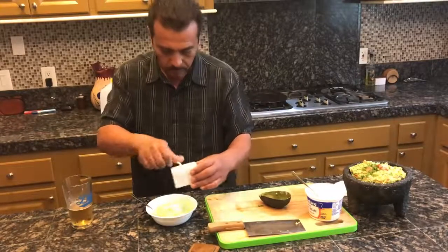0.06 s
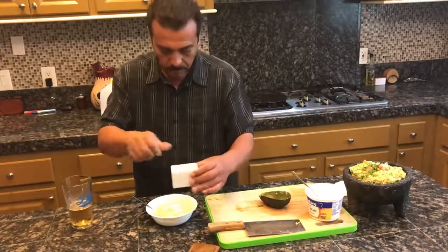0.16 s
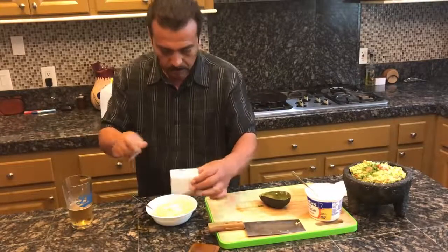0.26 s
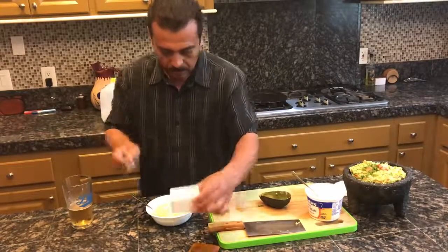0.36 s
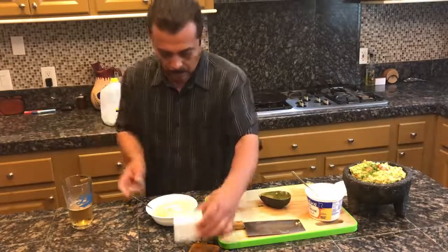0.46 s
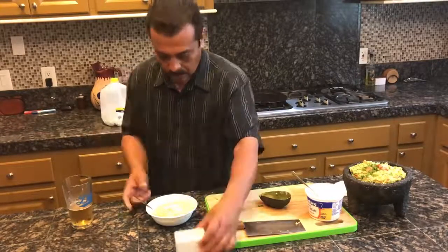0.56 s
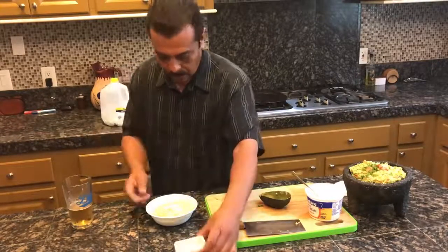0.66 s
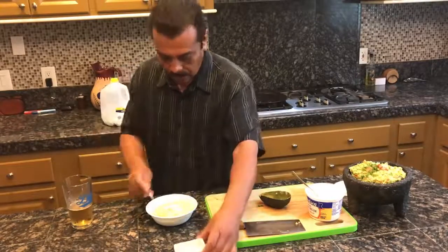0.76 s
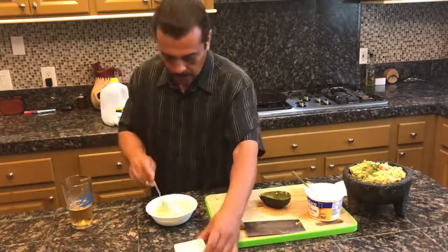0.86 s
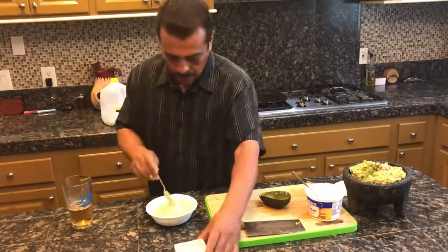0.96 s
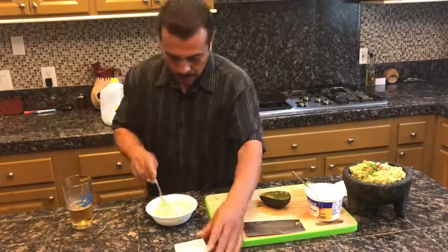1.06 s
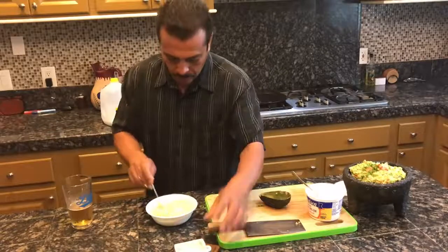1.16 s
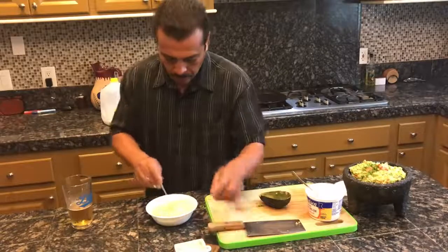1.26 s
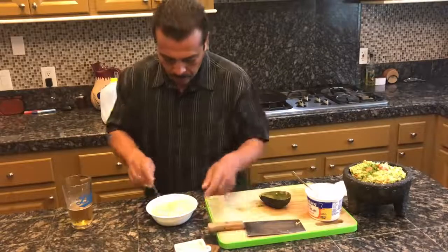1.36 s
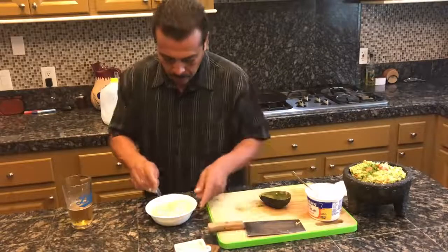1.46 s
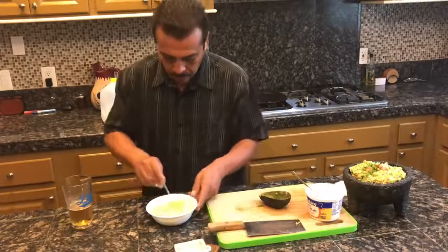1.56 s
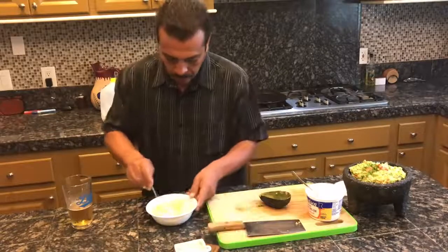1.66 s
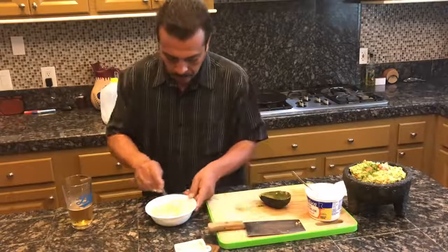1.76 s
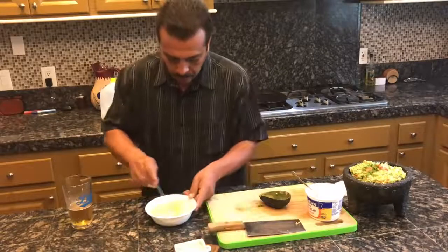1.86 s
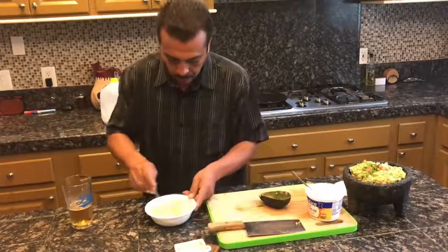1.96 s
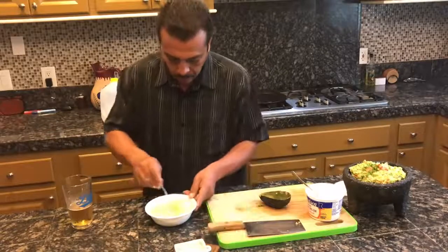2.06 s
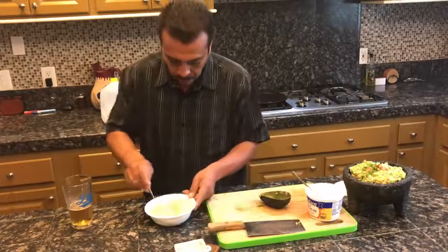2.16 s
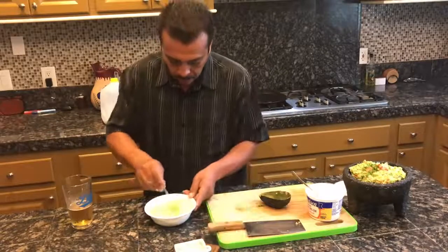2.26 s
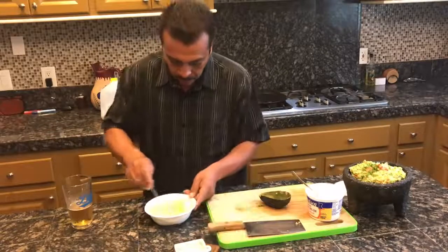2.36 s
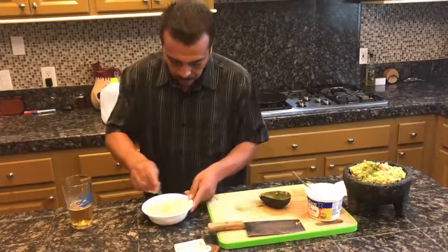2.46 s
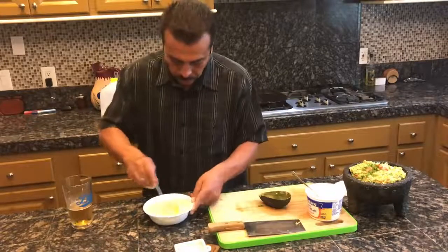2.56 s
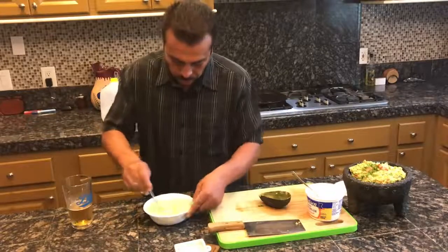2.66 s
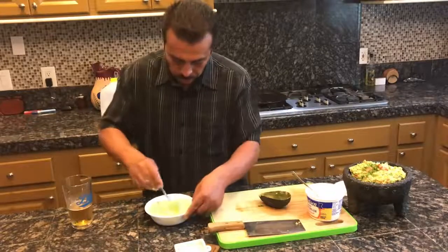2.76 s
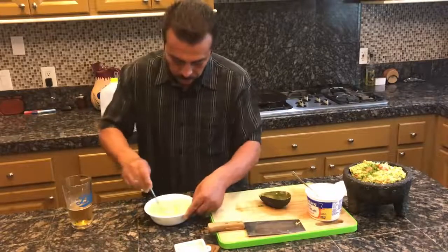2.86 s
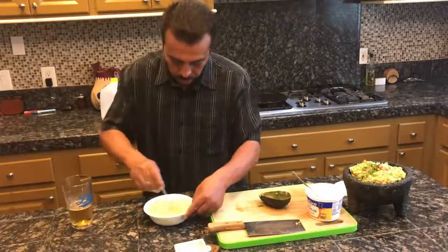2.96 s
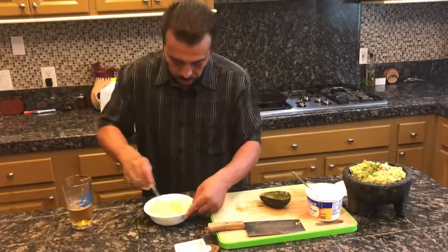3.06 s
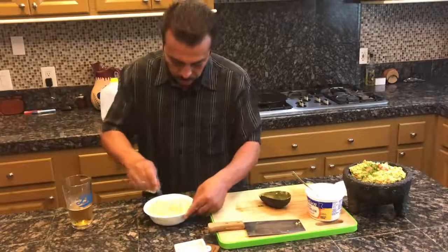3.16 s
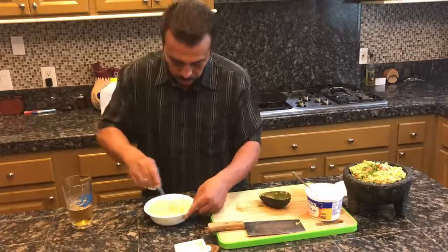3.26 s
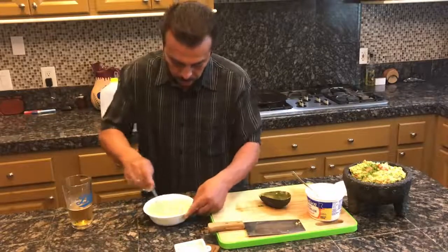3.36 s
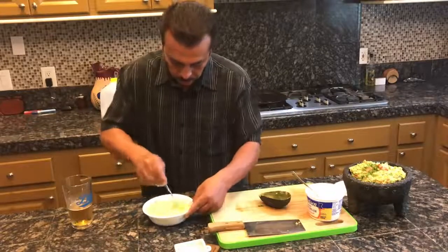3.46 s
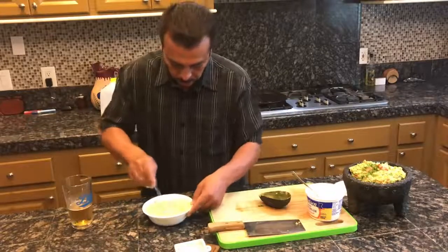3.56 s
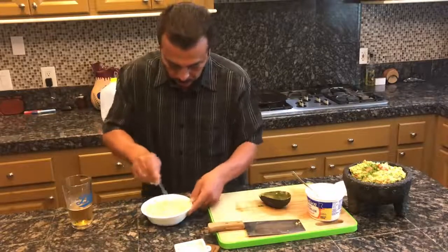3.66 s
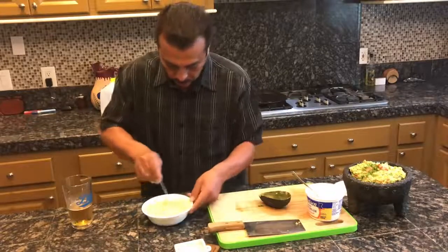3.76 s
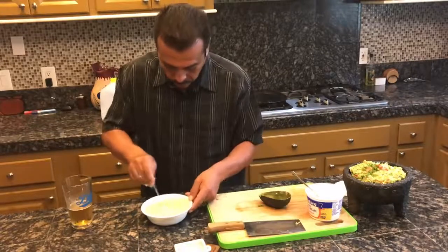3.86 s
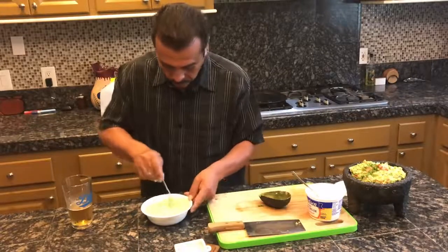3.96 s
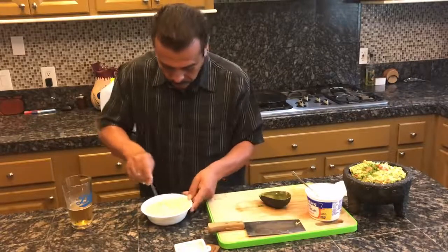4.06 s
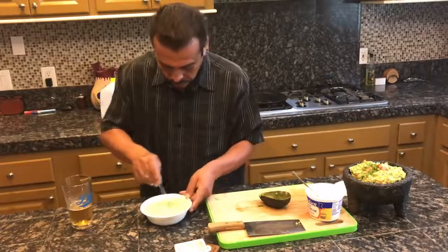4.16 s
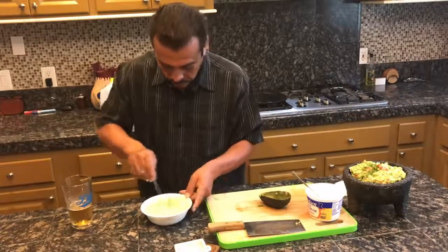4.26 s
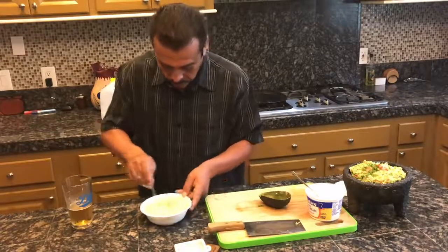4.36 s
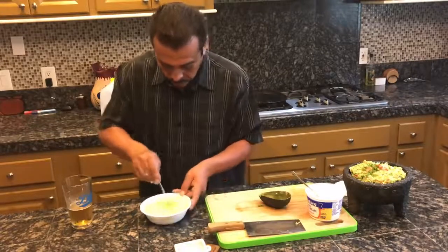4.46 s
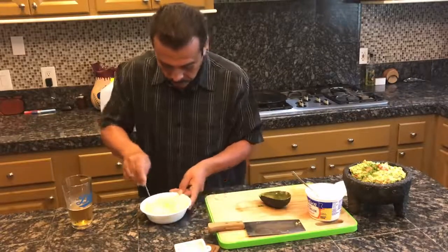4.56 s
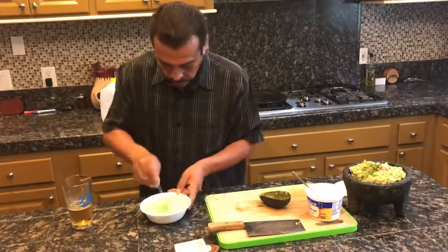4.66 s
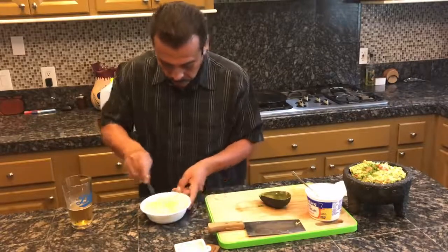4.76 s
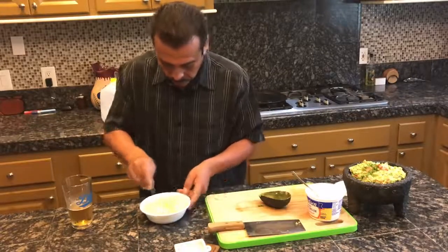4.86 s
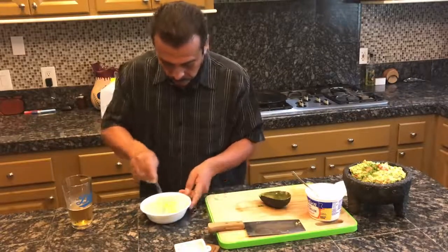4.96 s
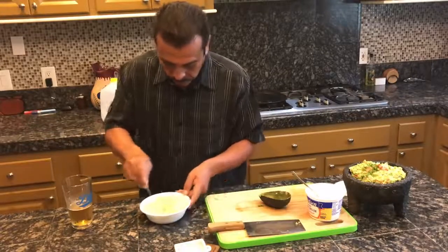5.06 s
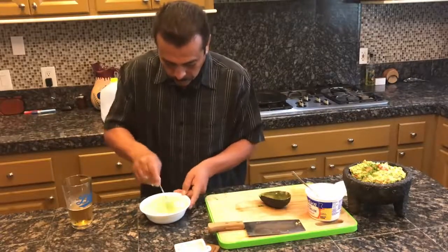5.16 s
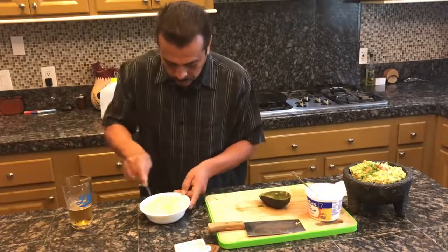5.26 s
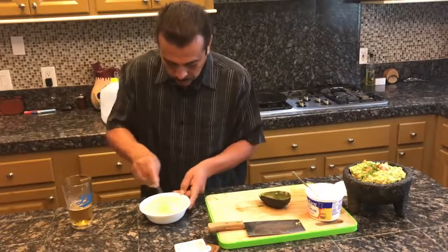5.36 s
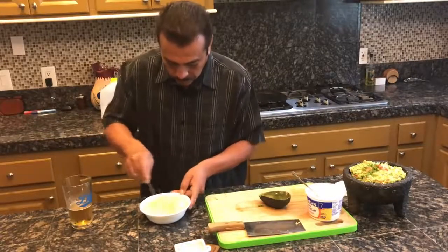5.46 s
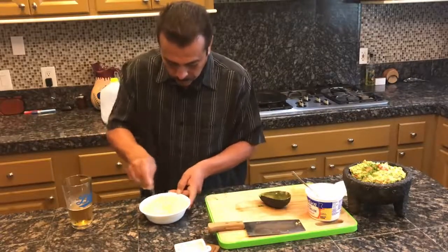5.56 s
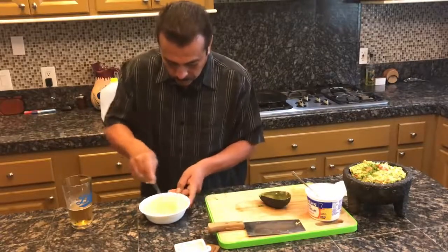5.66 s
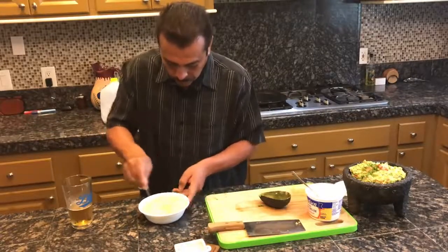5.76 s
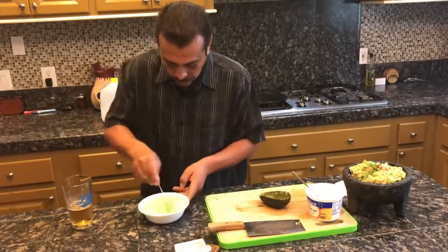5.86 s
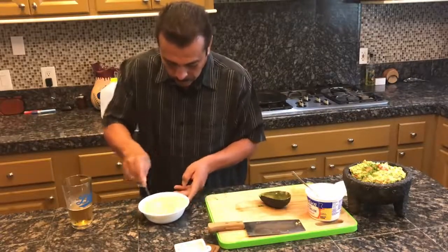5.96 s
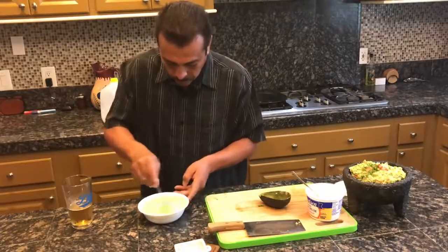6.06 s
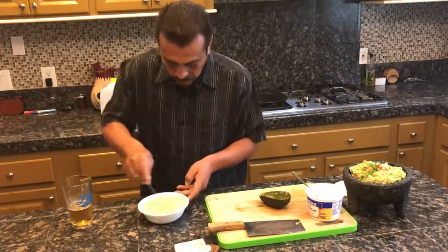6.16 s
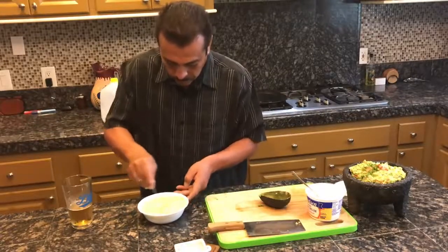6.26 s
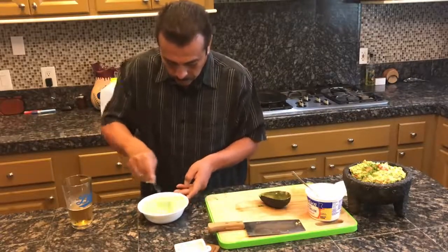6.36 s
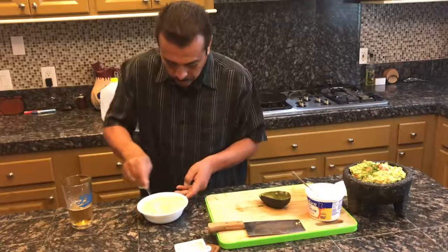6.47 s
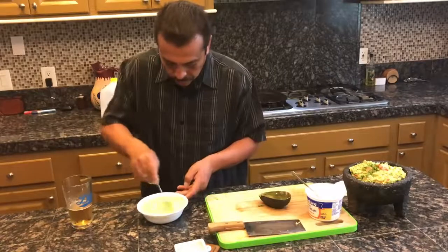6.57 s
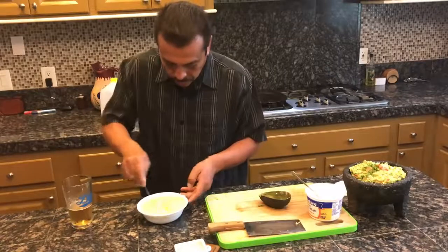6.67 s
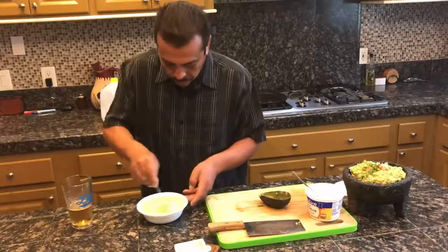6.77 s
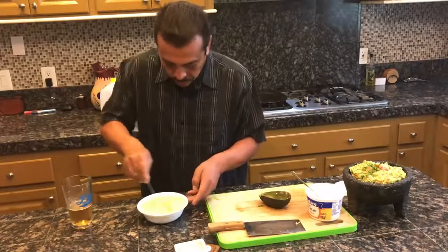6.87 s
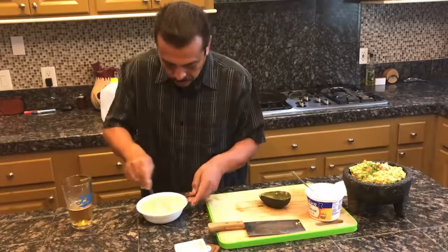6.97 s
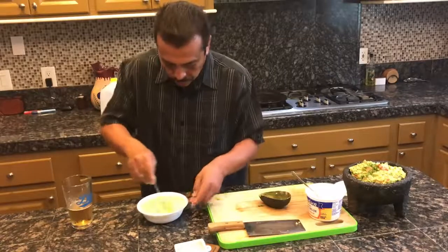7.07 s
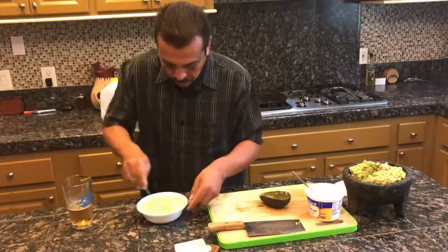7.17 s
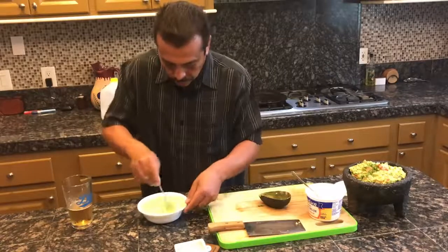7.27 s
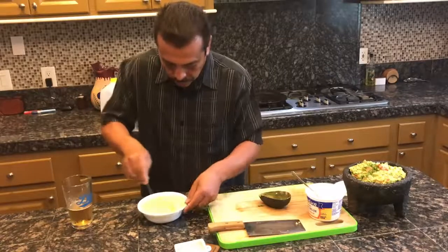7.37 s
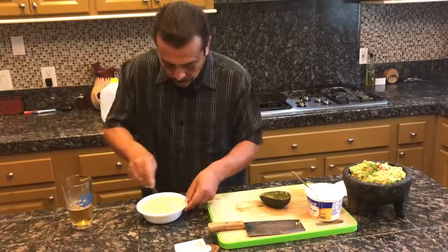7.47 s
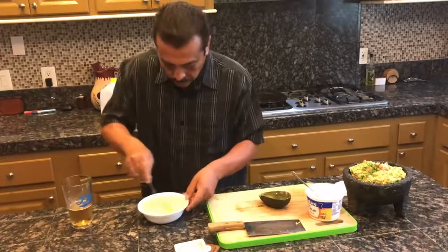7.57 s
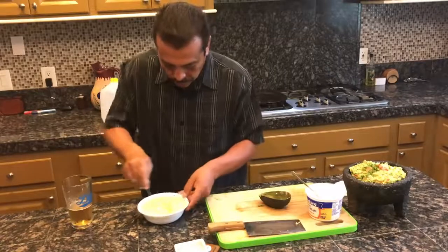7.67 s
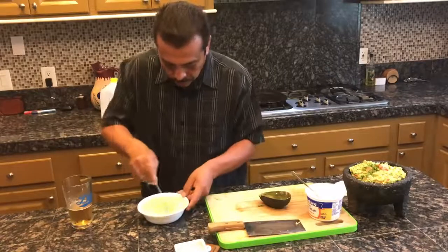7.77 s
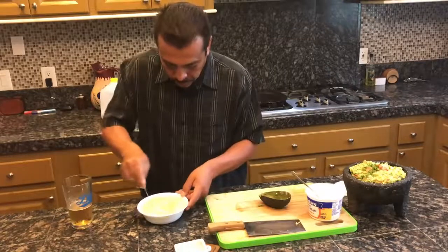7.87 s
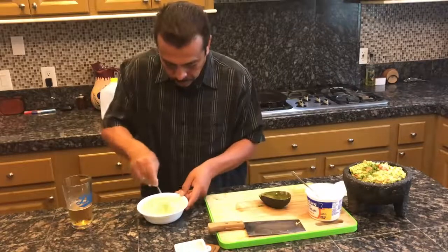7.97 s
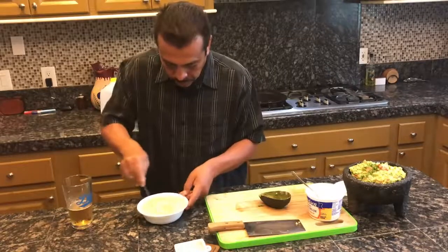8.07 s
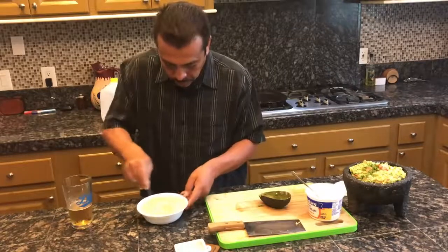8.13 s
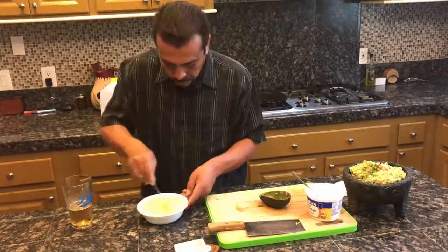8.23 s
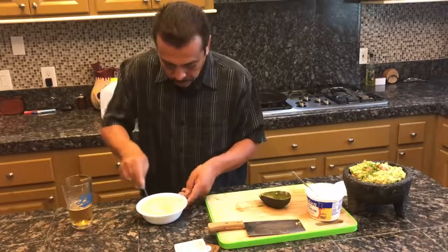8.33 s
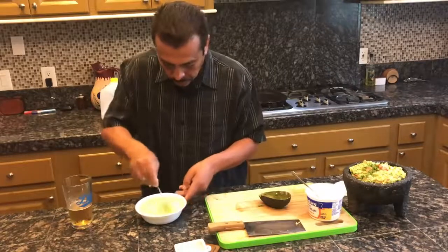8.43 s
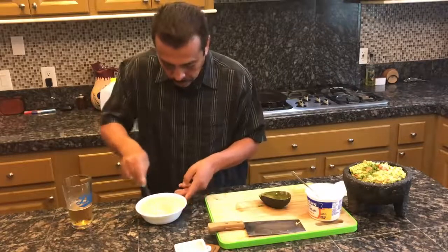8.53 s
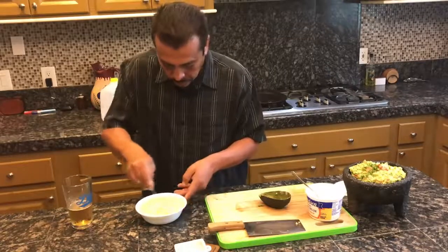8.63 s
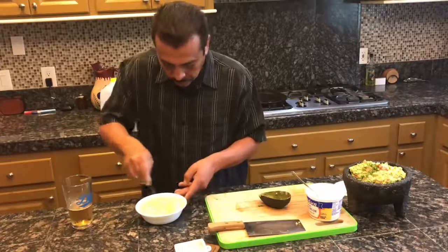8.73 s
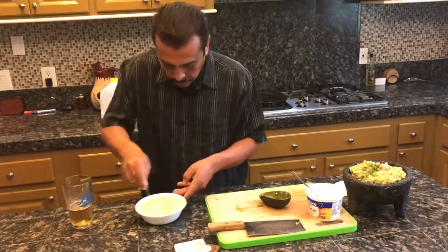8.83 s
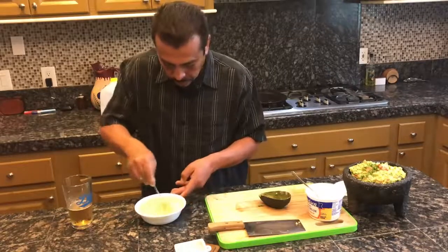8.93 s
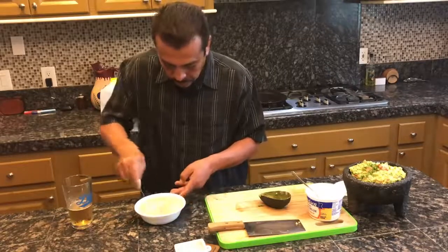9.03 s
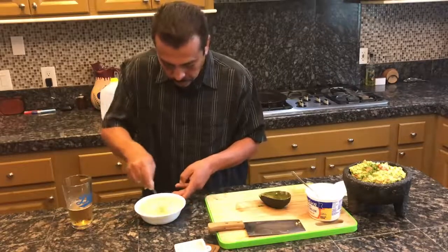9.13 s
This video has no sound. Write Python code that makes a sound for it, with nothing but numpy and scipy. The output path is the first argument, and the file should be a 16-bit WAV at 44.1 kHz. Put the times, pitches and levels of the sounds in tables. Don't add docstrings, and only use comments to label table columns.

```python
import sys
import numpy as np
from scipy import signal
from scipy.fft import irfft
from scipy.io import wavfile
from scipy.ndimage import uniform_filter1d

SR = 44100
rng = np.random.default_rng(int(sys.argv[2]) if len(sys.argv) > 2 else 0)


def decibels_to_gain(level_db):
    exponent = np.asarray(level_db, float) / 20
    return 10 ** exponent


def wrap_up_sound(samples):
    columns = np.atleast_2d(samples).T
    tamed = np.clip(columns, -1, 1)
    steps = np.round(tamed * 32767).astype(np.int16)
    wavfile.write(sys.argv[1], SR, steps)


N = 405719

# mode [Hz], width [Hz], level [dB].
WALL = [(1950, 400, 0.5), (2510, 590, -1), (3320, 610, 2)]
RIM = [(4250, 320, -8.5), (4310, 320, -4.5), (4430, 610, -8)]
SPOON = [(6360, 2000, -7), (7900, 4100, -4), (9600, 3900, -2.5)]
SPOON_TOP = [(11800, 2000, 2), (14200, 1900, -6)]
# start [s], tick [dB], bottom tone [dB], rim tone [dB], wall tone [Hz].
BEATS = [(1.68, -14.5, -35, -26, 2420), (1.899, -10.5, -40.5, -26.5, 2100),
         (2.1062, -14, -39.5, -31.5, 1890), (2.3481, -10, -33, -20, 2470), (2.564, -21, -32, -34.5, 2000),
         (2.804, -21, -34.5, -37.5, 2080), (2.915, -39, -49, -51, 1950), (3.0851, -13, -33.5, -26, 2440),
         (3.3281, -15, -28, -35.5, 2240), (3.6161, -15.5, -31, -35, 2410),
         (3.8623, -4.5, -20.5, -29.5, 1730), (4.1083, -8.5, -24, -36, 2930),
         (4.3349, -13.5, -32, -31, 2400), (4.5109, -11.5, -36.5, -32, 1870)]
# wall [dB], deep bottom [dB], upper wall [dB], rim [Hz].
BEAT_SPOTS = [(-33.5, 4, 0, 4260), (-33, 7.5, 0, 4220), (-37, 5.5, -1, 4210), (-28, 4, -5, 4280),
              (-34, 8, -3.5, 4300), (-41, 6.5, -3, 4200), (-48, -11, -9, 4400), (-34, 4.5, -3, 4270),
              (-31, 5, -10, 4400), (-33, -3, -0.5, 4480), (-23.5, 2, 1.5, 4700), (-29, -4, -2, 4100),
              (-30, 4.5, -1, 4000), (-34, 0, -5, 3860)]
BEAT_SHARPNESS = [4, 2, 1, 3, 6, 6, 0, 4.5, 6, 2, -3, -2, 5, 5]
# start [s], tick [dB], bottom tone [dB], wall tone [dB], wall tone [Hz].
TAPS = [(4.714, -24, -42.5, -37, 2400), (5.179, -45, -62, -50, 3530), (5.4114, -42, -59, -56.5, 3320),
        (5.638, -38, -62, -45.5, 4030), (5.874, -27.5, -45, -42.5, 3180), (6.1297, -20, -37.5, -39, 1820),
        (6.5346, -23.5, -51, -53, 3540), (6.5496, -41, -45.5, -45.5, 2070), (6.766, -25, -62, -51.5, 2380),
        (7.0065, -22.5, -50, -46, 2200), (7.2757, -31.5, -59, -47, 3140), (7.5449, -21, -40.5, -37, 3120),
        (7.746, -36, -57, -49, 3380), (8.21, -47, -69, -55, 3200), (8.4307, -34, -52.5, -52.5, 3200),
        (8.8038, -32, -45.5, -46.5, 2230), (8.865, -32, -66, -47.5, 3270), (9.046, -46, -54.5, -55, 2080)]
# start [s], level [dB], pitch [Hz].
ACCENTS = [(1.68, 3.5, 2510), (1.68, 4, 1050), (1.899, 7.5, 2010), (2.1065, -2, 3820), (2.3484, 14, 2450),
           (2.3484, 16.5, 4750), (2.3484, 8, 6270), (2.5641, -5, 4500), (4.7142, 0, 2715),
           (2.5641, -10, 2500), (2.5641, -5, 3700), (2.804, -6, 3840), (2.915, -3, 2000),
           (3.0852, 7.5, 1950), (3.0852, -5, 3280), (3.3281, 7.5, 3290), (3.6163, -9, 1950),
           (3.8628, 9.5, 2960), (4.1089, 7, 4580), (4.3353, 3, 5220), (4.5114, 9, 1850), (4.5114, 7, 4270),
           (6.5351, -9, 4800), (8.8041, -1, 2340), (4.7142, 6.5, 3890), (5.875, -30, 3360),
           (7.0072, -1, 7900), (6.1292, -15, 3680)]
# time [s], pitch [Hz].
BOTTOM_TONE = [(2.1, 1490), (2.35, 1100), (2.8, 1210), (3.6, 1185), (4.1, 1320), (4.33, 1234), (5.9, 1340),
               (7.55, 1230), (8.8, 1510)]
# start [s], level [dB], pitch [Hz].
ROCKS = [
    (2.235, -27.5, 950),
    (2.451, -22.5, 860),
    (2.544, -26, 866),
    (2.625, -36, 1150),
    (6.59, -47, 1170),
]
# start [s], level [dB], pitch [Hz].
GRAZES = [(5.031, -35, 977), (5.218, -36, 2700), (5.689, -30, 820), (7, -34, 1500), (6.298, -31, 1700),
          (6.911, -32, 2600), (7.328, -28, 990), (8.018, -47, 1150), (8.24, -40, 1000),
          (8.439, -29.5, 2850), (8.919, -43, 902), (6.434, -30.5, 3200), (6.205, -28, 4200),
          (7.985, -39, 3300), (8.022, -35, 2000), (8.285, -35.5, 2200), (8.633, -39, 2600),
          (9.115, -32.5, 3400), (2.9, -30, 2800), (1.449, -39, 1260), (5.879, -40, 3800),
          (8.818, -26, 1800), (8.832, -37, 1550), (8.848, -45, 1300), (5.9, -24.5, 1500),
          (6.146, -36, 1200), (5.9, -30, 2600), (7.553, -27, 3000), (7.284, -32, 2600), (5.645, -32, 3800),
          (6.595, -29, 1750)]

# start [s], level [dB], centre [Hz].
WET_TICKS = [(0.2753, -43, 9100), (1.375, -34, 9400), (1.4522, -44, 11000), (1.672, -30, 11400),
             (2.4791, -29.5, 6200), (2.6278, -30, 9300), (2.6498, -30, 7900), (2.7314, -32, 8800),
             (2.8905, -34, 8380), (4.6375, -33, 11500), (4.7722, -36, 8850), (4.7864, -14, 8550),
             (4.8904, -30, 10300),
             (5.0256, -29.5, 8400), (5.24, -33, 10200), (5.252, -27.5, 10100), (5.3627, -29, 8500),
               (5.453, -29, 11500), (5.4974, -32.5, 9800), (5.5918, -35, 8400), (5.704, -29, 9600),
               (5.7097, -27, 11200), (5.7456, -33, 9100), (5.812, -29, 10300), (5.944, -26, 10300),
               (5.951, -25, 9100), (5.956, -21, 10400), (6.2046, -25, 11900), (6.299, -24, 7300),
               (6.412, -31, 10500), (6.4329, -19, 11300), (6.7394, -30, 9600), (6.911, -26, 7100),
               (7.327, -24, 11300), (7.336, -25, 9300), (7.467, -30.5, 9900), (7.7228, -33, 8540),
               (7.846, -30.5, 11400), (8.0641, -26, 7400), (8.312, -31, 7400), (8.5145, -32, 8750),
               (8.9173, -32, 9600), (9.1342, -23.5, 8000),
             (4.9887, -38, 8000), (5.006, -37, 12100), (5.034, -37, 10000), (5.1797, -40, 13500),
               (5.231, -34, 10400), (5.447, -37, 12000), (5.484, -37, 11000), (5.492, -35, 8000),
               (5.505, -44, 12500), (5.677, -46, 10000), (5.724, -33, 9000), (6.059, -31, 7440),
               (6.6559, -36, 8000), (7.211, -40, 7610), (7.2546, -43, 7000), (7.363, -31, 11700),
               (7.6262, -38, 11000), (7.8146, -37, 10800), (7.944, -36, 7750), (8.044, -44, 6940),
               (8.2597, -39, 9180), (8.2827, -39, 6060), (8.633, -31, 9100), (8.6972, -39, 11900),
               (8.7326, -39, 8910), (8.761, -34, 11600), (8.941, -34.5, 8300), (8.9931, -36, 12860),
               (9.005, -37.5, 6440), (9.107, -38, 8770), (9.113, -40, 7640), (9.181, -38, 6940)]
SMALL_TICKS = [(2.147, -38, 9000), (3.565, -43, 13000), (3.840, -43, 5500), (4.654, -39, 4000),
               (4.7304, -35, 11260), (4.802, -44, 7090), (5.020, -42, 7000), (5.065, -44, 6570),
               (5.4634, -44, 7400), (5.8965, -42, 11500), (6.2938, -37, 7100), (6.5484, -34, 11800),
               (6.8483, -44, 8040), (6.8554, -44, 7180), (6.9015, -45, 6560), (7.1462, -48, 7200),
               (7.16, -44, 8050), (7.2614, -41, 7114), (7.3208, -41, 9000), (7.6114, -41, 11500),
               (7.6374, -42, 8920), (7.6575, -45, 6790), (7.7178, -41, 9310), (7.7414, -35, 8250),
               (7.8297, -41, 5480), (7.9754, -43, 8860), (7.9838, -47, 7690), (8.0192, -47, 9110),
               (8.0744, -42, 7150), (8.1773, -41, 12800), (8.2657, -43, 9770), (8.305, -39, 7010),
               (8.870, -44, 12100), (8.9654, -47, 11900), (9.1177, -35.5, 7630), (9.1944, -38, 6460)]
# mode [Hz], width [Hz], level [dB].
GLINTS = [(4280, 1100, -10), (7000, 1700, -5.5), (9250, 1400, -8), (11900, 2200, -3.5), (14500, 2400, -10)]
# middle [s], level [dB], pitch [Hz].
SLOSHES = [(5.029, -65, 953), (5.491, -60, 1480), (5.6, -58.5, 984), (7.251, -58.5, 987), (7.97, -57, 1050),
           (8.19, -64, 994), (8.421, -60, 952), (8.69, -58, 1017), (8.93, -58, 926), (9.05, -71, 977),
           (8.83, -60, 1500)]
# time [s], level [dB].
PRESSURE = [(4.72, 7.5), (4.86, 1), (5.4, 1), (5.74, 3.5), (5.85, -1), (6.0, 2.5), (6.5, -2.5), (6.89, 2),
            (7.5, -4), (8.0, -1), (8.6, -1.5), (9.2, 4.5)]
# frequency [Hz], level [dB per Hz].
DRAG_TONE = [(250, -43), (500, -3.5), (800, -9), (1100, 0), (1500, -9.5), (2200, -11.5), (4500, -15),
             (6000, -58)]
FIZZ_TONE = [(3000, -26), (5000, -12), (7500, -9), (12000, -9.5), (16000, -8.5)]
# peak [s], level [dB], fade [dB per s].
RUSTLE = [
    (0.096, -50.5, 152),
    (1.105, -48.5, 129),
    (4.62, -63, 146),
]

# frequency [Hz], width [Hz], level [dB].
SNAP = (0.112, -13)
SNAP_MODES = [(1500, 340, 1), (3530, 4200, -11.5), (5760, 270, -3), (8400, 240, 5), (11300, 700, -7)]
TOUCH = (.7612, 2.7)
TOUCH_MODES = [(850, 770, -12.5), (1400, 980, -24), (2100, 650, 0.5), (3220, 2300, -9.5), (4800, 420, -6.5),
               (7000, 600, -8.5), (9100, 2200, -12.5), (13000, 3300, -23)]
LAND = (.9038, 17.1)
LAND_MODES = [(750, 500, -18), (1077, 650, -2), (1510, 500, 2), (2000, 600, 0), (2680, 1900, -6),
              (3253, 225, 3.5), (4150, 1900, -10), (6760, 1200, -18), (8400, 240, -11.5)]
# (frequency [Hz], width [Hz], level [dB]).
LID = (0.724, -22), [(3110, 69, 0)]
EDGE_FIRST = (.891, -11), [(2040, 540, 4), (8000, 2400, -27)]
CORNER = (.7612, 7.2), [(2110, 640, 0.5)]
FACE = (.9042, 18), [(1850, 550, 0), (3360, 430, -1), (8450, 300, -24)]
GLASS = (.906, 8.1), [(3150, 60, -4), (3310, 41, -4), (3235, 40, -2), (8400, 170, -14)]
# mode [Hz], t60 [s], level [dB].
AFTERRING = (.906, -45), [(3290, 0.78, 0.5), (3140, .8, -1)]

# start [s], boom [dB], cabinet [dB], slab [dB].
THUMPS = [(0.762, -37, -33, -63), (0.902, -32, -25.5, -33), (1.68, -50.5, -43.5, -44),
          (1.9, -49, -39.5, -39.5), (2.106, -49.5, -42, -42), (2.233, -55, -36, -33),
          (2.347, -49, -40, -30.5), (2.451, -45.5, -39.5, -40), (2.56, -38.5, -36, -29),
          (2.802, -48, -45, -47), (3.085, -52, -40, -46), (3.327, -46.5, -36, -20),
          (3.614, -53, -38.5, -36.5), (3.863, -43, -37, -54), (4.108, -45.5, -39, -46),
          (4.332, -46, -38, -37), (4.511, -46.5, -39, -37), (4.713, -54, -50.5, -40),
          (5.873, -58, -56, -46), (6.13, -49, -47, -37), (7.547, -52, -51.5, -33.5)]
# mode [Hz], t60 [s], level [dB].
BOOM = [(84.4, 0.24, 12), (104, 0.115, 5)]
# mode [Hz], width [Hz], level [dB].
CABINET = [(145.5, 34, 16.5), (224.2, 27.5, 11), (347, 23, -0.5), (472, 38, -2.5), (595, 150, 2)]
SLAB = [(492, 300, -4.5), (627, 325, 1.5)]
# start [s], level [dB], pitch [Hz].
HOLLOW = [
    (0.911, -9, 350),
    (2.57, -10, 370),
    (3.332, -7, 384),
    (3.62, -23, 370.3),
    (4.335, -26, 351),
    (4.51, -17, 364),
    (0.766, -8, 201),
    (0.768, -12, 800),
]

# frequency [Hz], t60 [s].
ROOM_DECAY = [(60, 0.1), (250, 0.56), (700, 0.73), (1500, 0.7439), (3000, 0.74), (6000, 0.66),
              (10000, 0.49), (16000, 0.46)]
# frequency [Hz], level [dB].
ROOM_RETURN = [(200, 7), (1500, -0.5), (5000, 1.5), (10000, -4.5), (16000, -5.5)]
# delay [s], level [dB].
ECHOES = [(.0013, -25.5), (.0058, -7), (0.01, -9.5), (.016, -7.5), (.019, -8), (0.026, -11)]
# frequency [Hz], level [dB].
HUSH = [(15, -51), (30, -22), (60, -7), (84, -1.5), (110, -3.5), (140, -8), (280, -13.5), (500, -18.5),
        (1300, -23), (3000, -29), (10400, -32.5), (16000, -29)]
# frequency [Hz], level [dB].
MIC = [(20, -5), (60, 4), (4500, 1), (5100, 1.5), (5800, 2), (9600, -0.5), (10400, -3), (11300, -0.5),
       (16000, -2.5)]


def evened(x):
    return x / np.sqrt(np.mean(x ** 2) + 1e-20)


def read(points, hz):
    f, value = np.transpose(points)
    return np.interp(np.log(hz + 1), np.log(f + 1), value)


def add(mix, s, sound):
    part = mix[round(s * SR):][:len(sound)]
    part += sound[:len(part)]


def blow(modes, chance, skirt=1.49, chatter=1.69, late=0.001067):
    hz = abs(np.fft.fftfreq(4096, 1 / SR))
    power = sum(decibels_to_gain(db) ** 2 / (1 + (2 * (hz - f) / width) ** 2) ** skirt for f, width, db in modes)
    log_gain = np.log(power * np.minimum(hz / 300, 1) ** 4 + 1e-6 * power.max()) / 2
    minimum_phase = np.exp(np.conj(signal.hilbert(log_gain)))[:2049]
    hz = hz[:2049]
    spots = np.linspace(0, SR / 2, len(chance))
    delay = late / (1 + (hz / 2500) ** 2)
    delay = delay + chatter * late * abs(np.interp(hz, spots, chance)) / 2
    lag = np.exp(-2j * np.pi * np.cumsum(delay) * SR / 4096)
    return irfft(minimum_phase * lag)[:2048]


def ring(modes, chance, spread, rise):
    t = np.arange(round(SR * max(m[1] for m in modes))) / SR
    y = np.zeros(len(t))
    for (hz, t60, db), u, v in zip(modes, chance, chance[::-1]):
        fade = decibels_to_gain(db + 0.86 * u - 60 * t / t60)
        y += fade * np.sin(2 * np.pi * hz * (1 + spread * v) * t + 2 * u)
    y = y * (1 - np.exp(-t / rise))
    return y / abs(y).max()


def coloured(tone, patchy_db, size=512):
    frames, hz = 4 * N // size + 5, np.fft.rfftfreq(size, 1 / SR)
    a, b, patches = rng.standard_normal((frames, len(hz), 3)).T
    patches = uniform_filter1d(uniform_filter1d(patches, size=9, axis=0), size=9, axis=1)
    z = (a + 1j * b) * decibels_to_gain(read(tone, hz)[:, None] + patchy_db * evened(patches))
    return evened(signal.istft(z, nperseg=size, noverlap=3 * size // 4)[1][:N])


def knock(out, facing, row, u):
    s, tick_db, low_db, wall_db, rim_db, wall_hz, deep_db, upper_db, rim_hz, edge_db = row
    low_hz = np.interp(s, *np.transpose(BOTTOM_TONE))
    bottom = [(low_hz, 220, low_db + 43.0), (980, 200, low_db + deep_db + 35),
              (1400, 300, low_db + 37.5), (620, 400, low_db + 18)]
    shifted = [(f * (1 + 0.041 * a), w * 1.03, db + upper_db * (f > 2900) + 0.65 * b)
               for (f, w, db), a, b in zip(WALL, u[3:], u[6:])]
    wall = [(f, w, db + wall_db + 32.5) for f, w, db in shifted + [(wall_hz, 380, 4)]]
    smear = 1 + 2.0 * (s > 3.2)
    rim = [(f * rim_hz / RIM[1][0], w * smear, db + rim_db + 37.5) for f, w, db in RIM]
    spoon_hz = 7400 + 1530 * np.tanh(u[1])
    sharp_db = -5 * np.tanh(u[2])
    spoon = [(f, w, db + tick_db + 11.5) for f, w, db in SPOON + [(spoon_hz, 900, 1.5)]]
    top = [(f, w, db + tick_db + sharp_db + edge_db + 7.0) for f, w, db in SPOON_TOP]
    accent = [(f, 260, db) for when, db, f in ACCENTS if abs(when - s) < 1 / 200]
    broad_accent = [(f, 1.6 * w, db - 5.0) for f, w, db in accent]

    chatter = 1.35 + 2.405 * (tick_db < -24)
    add(out, s + .0004, blow(bottom + wall + broad_accent + rim + spoon + top, u, skirt=1.64, chatter=chatter))
    if accent:
        add(facing, s + .0004, decibels_to_gain(-5.5) * blow(accent, u, skirt=3.0, chatter=1.3))
    return_s = s + 0.0016 + .0006 * np.tanh(u[0])
    add(facing, return_s, decibels_to_gain(-4.0) * blow(wall + accent + rim + spoon, u[::-1]))


def bowl():
    knocks = []
    for (s, tick, low, rim, hz), (wall, *spot), sharp in zip(BEATS, BEAT_SPOTS, BEAT_SHARPNESS):
        knocks.append((s, tick, low, wall, rim, hz, *spot, sharp))
    for s, tick, low, wall, hz in TAPS:
        knocks.append((s, tick, low, wall, wall - 5.5, hz, 0, 0, 4300, 2.5))
    out, facing = np.zeros(N), np.zeros(N)
    chance = rng.standard_normal((len(knocks) + len(ROCKS), 40))
    for row, u in zip(knocks, chance):
        knock(out, facing, row, u)
    for (s, db, hz), u in zip(ROCKS, chance[len(knocks):]):
        add(out, s, blow([(hz, 300, db + 30.0), (520, 250, db + 25), (930, 200, db + 29)], u, chatter=3.93))
    for (s, db, hz), u in zip(GRAZES, chance[::-1]):
        add(out, s, blow([(hz, 600, db + 17.0), (1250, 500, db + 15.0)], u, chatter=4.47))
    return out, facing


def tears(rows, level_db):
    out, snaps = np.zeros(N), np.zeros(N)
    lead = round(.008 * SR)
    for (s, db, hz), u in zip(rows, rng.standard_normal((len(rows), 16))):
        film = [(hz, (0.42 + 0.12 * np.tanh(u[2])) * hz, 0)]
        film += [(f, w, d + 7 * np.tanh(v)) for (f, w, d), v in zip(GLINTS, u[3:])]
        step_s = abs(np.r_[0, u[8:12]]) * .0007
        steps = np.bincount(np.round(step_s * SR).astype(int), np.r_[1, .6 * np.tanh(u[12:])])
        click = np.convolve(steps, blow(film, u, skirt=3, chatter=1.5, late=.0004))
        click = decibels_to_gain(db + level_db) * click / abs(click).max()
        grains = decibels_to_gain(-29) * rng.standard_normal(4 * lead) * (rng.random(4 * lead) < .06)
        grains = grains * np.exp(-abs(np.arange(4 * lead) - lead) / lead)
        grains[lead] = 1
        add(out, s - lead / SR, signal.fftconvolve(grains, click))
        add(snaps, s, click * (db > -31))
    return out, snaps


def ticks():
    out, snaps = tears(WET_TICKS, level_db=-4.0)
    for hz in np.geomspace(7000, 13000, num=5):
        falls = (rng.random(N) < 24 / SR) * (np.arange(N) > 4.75 * SR)
        falls = falls * decibels_to_gain(3.5 * np.minimum(rng.exponential(1, N), 2))
        click = blow([(hz, .8 * hz, 0)], rng.standard_normal(16), skirt=2, chatter=3, late=.0006)
        out += decibels_to_gain(-58) * signal.oaconvolve(falls, click / abs(click).max())[:N]
    return out, snaps


def sloshes():
    length_s, rise, rough = .05, 0.307, 0.63
    out, t = np.zeros(N), np.arange(0, length_s, 1 / SR)
    for s, db, hz in SLOSHES:
        wobble = evened(uniform_filter1d(rng.standard_normal(len(t)), size=150))
        note = np.sin(2 * np.pi * hz * t * (1 + rise * (t / length_s - 1) / 2))
        add(out, s - length_s / 2, decibels_to_gain(db) * np.hanning(len(t)) * (1 + rough * wobble) * note)
    return out


def stirring():
    t = np.arange(N) / SR
    pressure_db = np.interp(t, *np.transpose(PRESSURE))
    mixing = t > 4.72
    drag = mixing * decibels_to_gain(-60 + pressure_db) * coloured(DRAG_TONE, patchy_db=3.0, size=256)
    rustle = np.zeros(N)
    for s, db, fade_db in RUSTLE:
        rustle += np.clip((t - s) / 0.011, 0, 1) * decibels_to_gain(db - fade_db * abs(t - s))
    fizz = mixing * decibels_to_gain(-66.5 + 0.72 * pressure_db)
    return drag + (fizz + rustle) * coloured(FIZZ_TONE, patchy_db=0.5, size=256)


def carton():
    out, facing, chance = np.zeros(N), np.zeros(N), rng.standard_normal((7, 40))
    strikes = [(SNAP, SNAP_MODES), LID, (TOUCH, TOUCH_MODES), (LAND, LAND_MODES), EDGE_FIRST]
    for ((s, db), modes), u in zip(strikes, chance):
        add(out, s, decibels_to_gain(db) * blow(modes, u, skirt=1.85, chatter=1.46, late=0.001118))
    (s, db), modes = CORNER
    add(facing, s, decibels_to_gain(db) * blow(modes, chance[5], skirt=2.18, chatter=1.25))
    (s, db), modes = FACE
    add(facing, s, decibels_to_gain(db) * blow(modes, chance[6], skirt=1.6, chatter=.6))
    return out, facing


def glass():
    out = np.zeros(N)
    (s, db), modes = GLASS
    add(out, s, decibels_to_gain(db) * blow(modes, rng.standard_normal(40), skirt=1.8, chatter=1.1))
    (s, db), modes = AFTERRING
    add(out, s, decibels_to_gain(db) * ring(modes, np.zeros(2), spread=0, rise=0.003))
    return out


def counter():
    boom, cabinet, chance = np.zeros(N), np.zeros(N), rng.standard_normal((len(THUMPS), 40))
    for (s, boom_db, cabinet_db, slab_db), u in zip(THUMPS, chance):
        add(boom, s, decibels_to_gain(boom_db - 1.0) * ring(BOOM, u[:2], spread=0.011, rise=0.037))
        add(cabinet, s, decibels_to_gain(cabinet_db + 34.5) * blow(CABINET, u, chatter=1.0, late=0.00086))
        add(cabinet, s, decibels_to_gain(slab_db + 25.0) * blow(SLAB, u[::-1], chatter=1.0, late=0.00097))
    for (s, db, hz), u in zip(HOLLOW, chance):
        add(cabinet, s, decibels_to_gain(db) * blow([(hz, 90, 0)], u, chatter=0.91, late=0.00083))
    return boom, cabinet


def kitchen(x, wet_db=-2.5):
    out, t = np.zeros(N), np.arange(N) / SR
    dulled = signal.lfilter([.35], [1, -.65], x)
    for s, db in ECHOES:
        add(out, s, decibels_to_gain(db) * dulled)
    count = (SR - 73) // 16
    for k in range(3):
        taps = np.zeros(SR)
        places = np.arange(72, SR - 16, 16) + rng.integers(0, 16, count)
        taps[places] = rng.choice([-1., 1.], count)
        hz, s, z = signal.stft(taps, SR, nperseg=256)
        decay_db = read(ROOM_RETURN, hz)[:, None] - 60 * s / read(ROOM_DECAY, hz)[:, None]
        tail = signal.istft(z * decibels_to_gain(decay_db), SR, nperseg=256)[1]
        tail = tail * (1 - np.exp(-np.arange(len(tail)) / SR / 0.0011))
        turn = np.sqrt(2 / 3) * np.cos(np.pi * (t / .37 + k / 3))
        out += decibels_to_gain(wet_db) * signal.fftconvolve(x * turn, tail / np.linalg.norm(tail))[:N]
    return out


def hush():
    return decibels_to_gain(-59) * coloured(HUSH, patchy_db=1.5, size=2048)


def scene():
    boom, cabinet = counter()
    knocks, bowl_facing = bowl()
    box, box_facing = carton()
    wet, snaps = ticks()
    near = knocks + box + glass() + cabinet + sloshes()
    facing = bowl_facing + box_facing
    steady = kitchen(near + decibels_to_gain(-11.5) * facing) + boom + stirring() + hush()
    wet = wet + tears(SMALL_TICKS, level_db=0.5)[0]
    steady += wet - snaps + kitchen(wet, wet_db=-4.5)
    edge, top = (signal.firwin(401, hz, window=("kaiser", 9), fs=SR) for hz in (15950, 16750))
    sharp = signal.oaconvolve(near + facing + snaps, top, "same")
    return (sharp + signal.oaconvolve(steady, edge, "same"))[None]


def roll_off(x):
    return signal.sosfilt(signal.butter(12, 17040, fs=SR, output="sos"), x)


def record(dry):
    hz = np.fft.rfftfreq(1024, 1 / SR)
    colour = np.roll(irfft(decibels_to_gain(read(MIC, hz))), 512) * np.hanning(1024)
    mix = signal.oaconvolve(dry, colour[None], "same")
    return roll_off(mix)


dry = scene()
out = record(dry)
wrap_up_sound(out)
```